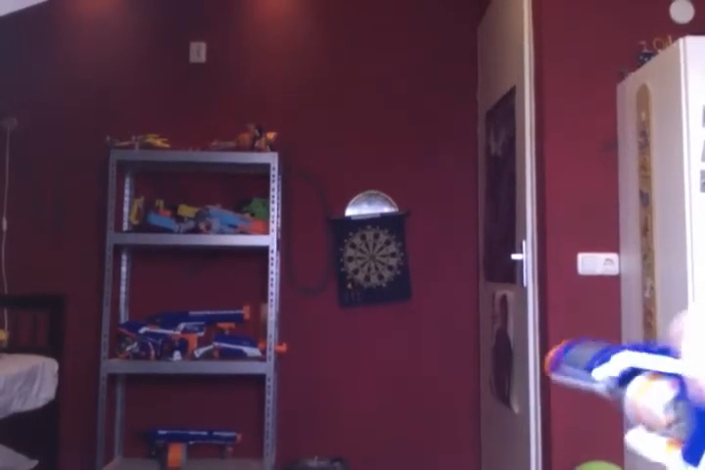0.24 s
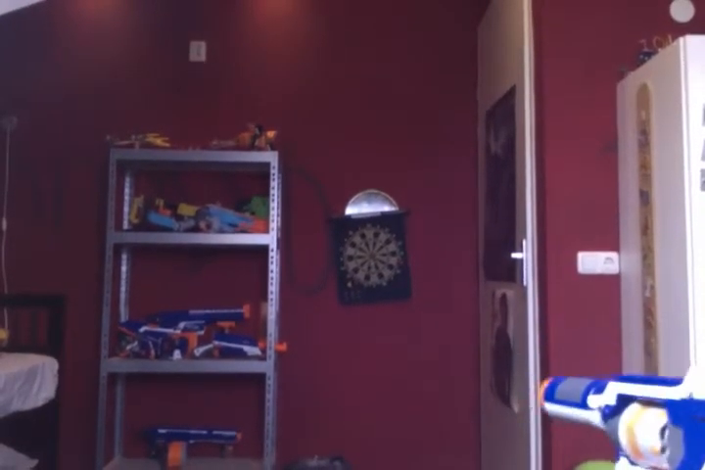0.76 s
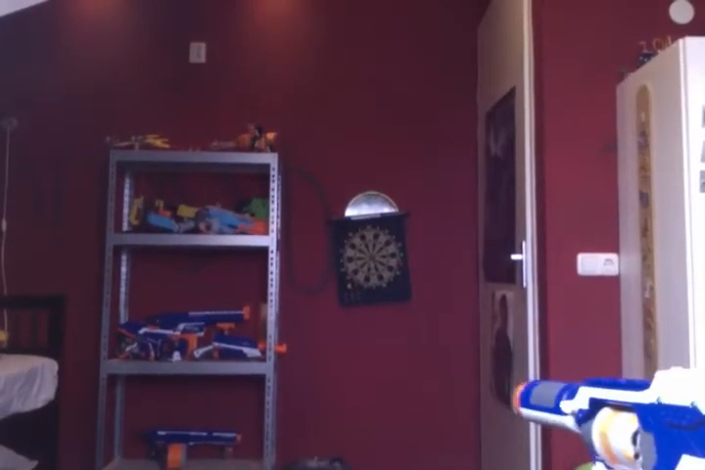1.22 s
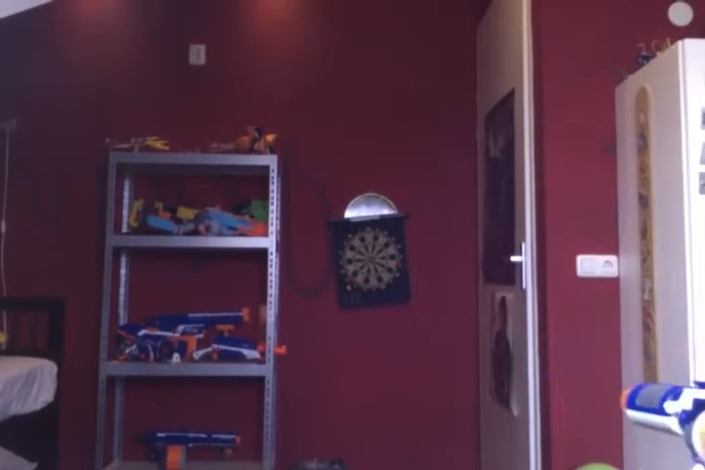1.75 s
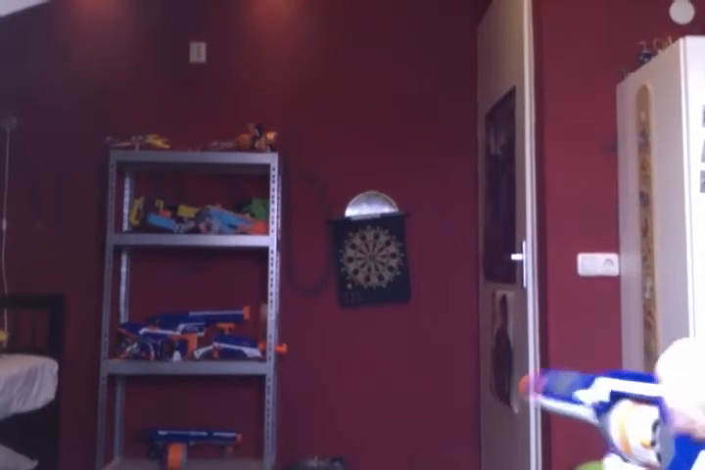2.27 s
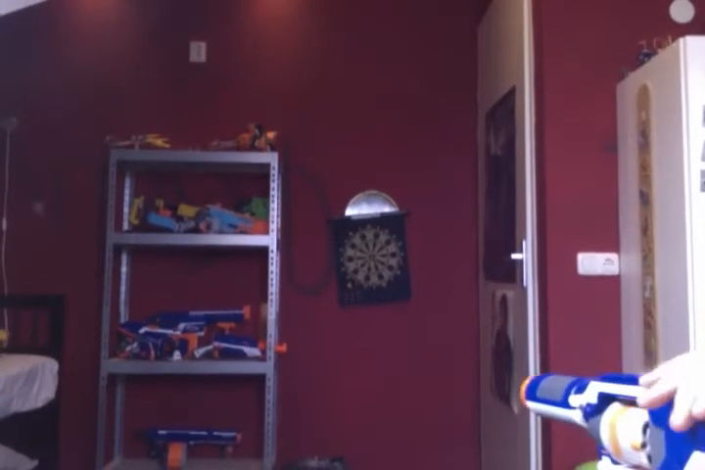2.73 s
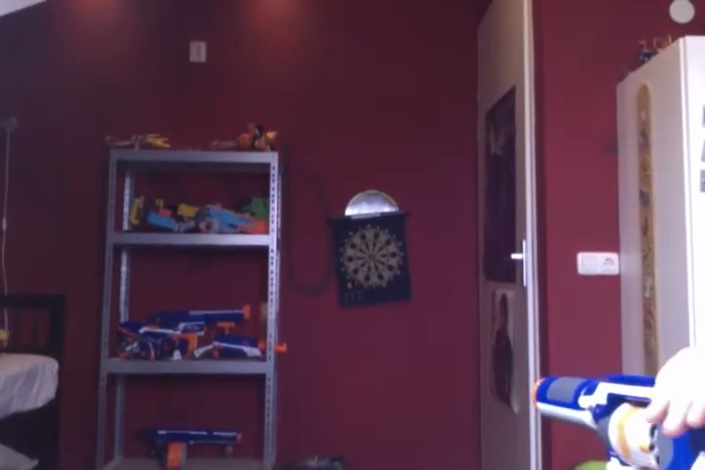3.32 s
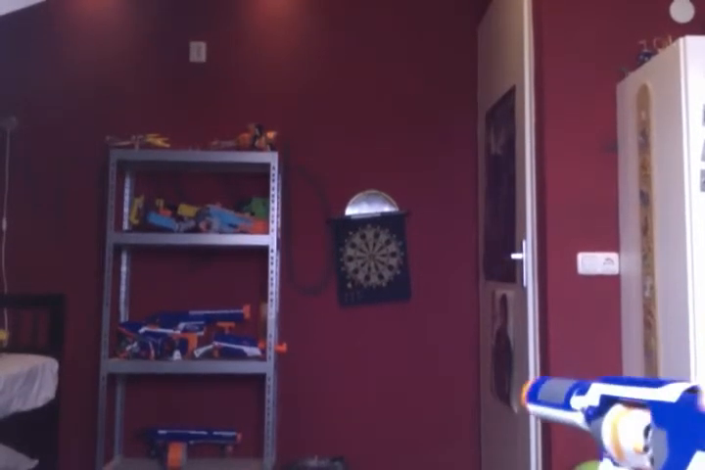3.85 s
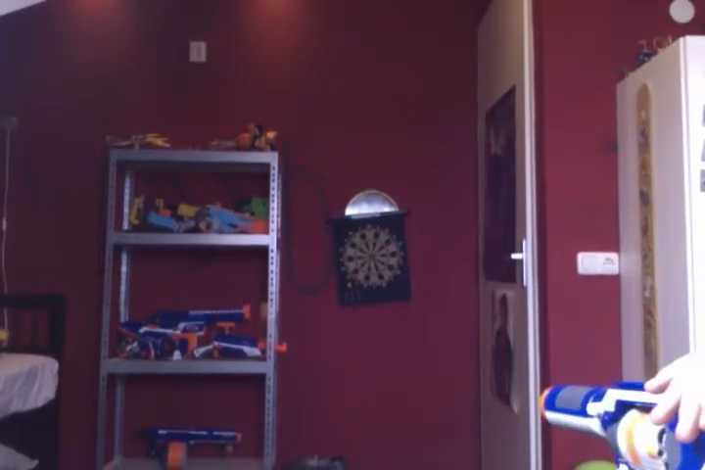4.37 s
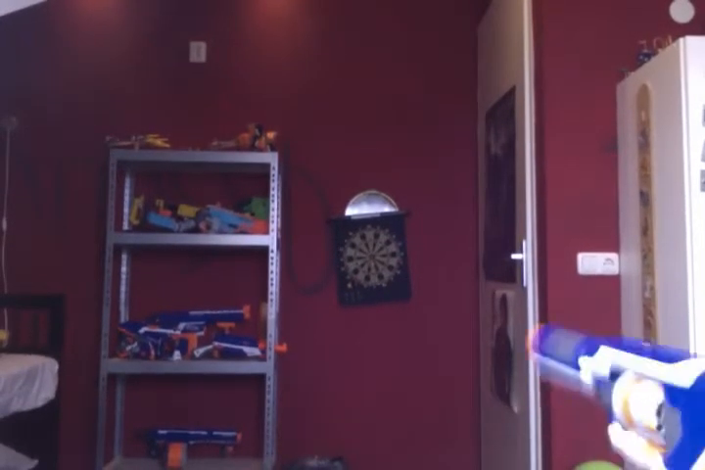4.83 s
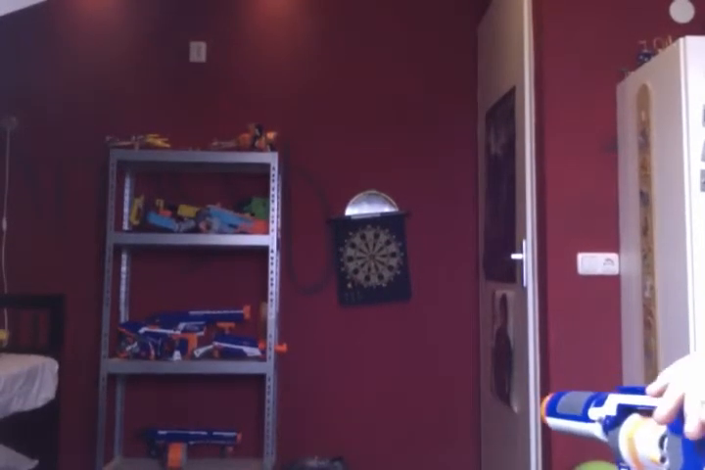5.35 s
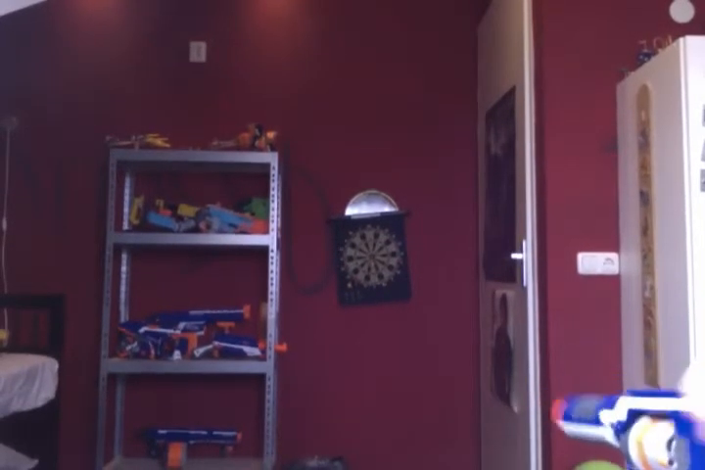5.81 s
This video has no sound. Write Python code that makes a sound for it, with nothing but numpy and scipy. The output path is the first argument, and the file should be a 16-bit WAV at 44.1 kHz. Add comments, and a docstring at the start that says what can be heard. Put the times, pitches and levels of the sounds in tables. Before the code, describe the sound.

A spring-powered toy dart blaster is repeatedly cocked with scraping plastic clacks and fired four times, each loud crack followed by a dart smacking a board.

```python
"""A small room, the microphone close to a spring-powered toy dart blaster that is fired four times.
Noise-driven resonances make the plastic clack as the slide scrapes back over its catch and is slammed home.
Each shot is a crack of filtered noise and a wavering barrel tone; a moment later the dart smacks a board
across the room. Hand bumps, rubs and a faint hush fill the gaps; the loudest blows overload the microphone."""
import sys
import numpy as np
from scipy import signal
from scipy.fft import rfft, irfft
from scipy.io import wavfile
from scipy.ndimage import uniform_filter1d

SR = 44100
rng = np.random.default_rng(int(sys.argv[2]) if len(sys.argv) > 2 else 0)


def transcribe(u):
    """Save the signal u as a 16-bit wav file named by the first command-line argument.

    u: samples, shape (n,) or (channels, n), limited to [-1, 1]; the rate is SR.
    q: integer samples, one column per channel.
    """
    v = np.clip(np.atleast_2d(u).T, -1, 1)
    q = np.round(v * 32767).astype(np.int16)
    wavfile.write(sys.argv[1], SR, q)


N = 268416  # length in samples

# resonances of the plastic shell: f/Hz, width/Hz, level/dB
SHELL = [(755, 450, 0.5), (825.5, 120, 8.5), (939, 110, 1.5), (1138, 94, 4), (1326, 120, -1),
         (1329, 120, -3)]
# resonances of the hollow inside: f/Hz, width/Hz, level/dB
HOLLOW = [(83.5, 42, -10.5), (140, 28, 0), (161.6, 22, 2), (258.3, 19, 8), (293, 150, -9), (585, 210, -3)]
# spectrum of a smack, also used for the tick of a bump: f/Hz, density/dB per Hz
SMACK = [(40, -35), (120, -6), (350, 0), (520, 2), (900, 1.5), (1350, 5), (2000, -2.5), (3500, -5),
         (5000, -18.5), (8000, -32), (16000, -46.5)]
# the slide is pulled back to cock the spring: t/s at the back stop, level/dB, draw length/s, scrape level/dB
PULLS = [(1.871, -1.5, 0.064, -15.5), (3.516, -1, 0.08, -18), (4.704, 0, 0.06, -16),
         (5.812, 1, 0.079, -17.5)]
# the slide is pushed forward and slammed home: t/s, edge crack level/dB, push length/s, scrape level/dB
SLAMS = [(.189, -5, 0.048, -14), (2.188, -11, 0.067, -18), (3.951, -16.5, 0.15, -26.5),
         (5.068, -18, 0.11, -25)]


def amp(db):
    """Turns decibels into an amplitude factor."""
    return 10 ** (np.asarray(db) / 20)


def evened(x):
    """Scales to an rms of one."""
    return x / np.sqrt(np.mean(x ** 2) + 1e-20)


def blow(x):
    """Scales to the energy of a hundredth of a second at an rms of one."""
    return x / np.sqrt(np.sum(x ** 2) * 100 / SR + 1e-20)


def read(points, hz):
    """Reads a table along a logarithmic frequency axis."""
    f, value = np.transpose(points)
    return np.interp(np.log(hz + 1), np.log(f), value)


def add(mix, s, sound):
    """Mixes a sound in at a time in seconds."""
    part = mix[max(round(s * SR), 0):][:len(sound)]
    part += sound[:len(part)]


def fades(size, rise_s, fall_s):
    """Smooth start and end of a stroke."""
    t = np.arange(size) / SR
    nearest_end = np.minimum(t / rise_s, t[::-1] / fall_s)
    return np.sin(np.pi / 2 * np.minimum(nearest_end, 1)) ** 2


def colour(x, spectrum, tilt_db=0, size=4096):
    """Causal minimum-phase filter with the given spectrum, tilted by dB per octave."""
    hz = abs(np.fft.fftfreq(size, 1 / SR))
    pivot_hz = 2000
    octaves = np.log2(np.maximum(hz / pivot_hz, .1))  # the tilt levels off in the bass
    log_gain = np.log(amp(read(spectrum, hz) + tilt_db * octaves))
    taps = np.fft.ifft(np.exp(np.conj(signal.hilbert(log_gain)))).real
    return signal.fftconvolve(x, taps[:size // 2])[:len(x)]


def ring(x, modes):
    """Sends a force through parallel resonances of alternating sign."""
    out = 0
    for k, (hz, width, db) in enumerate(modes):
        peak = signal.iirpeak(min(hz, SR / 2 - 1), hz / width, SR)
        out = out + (-1) ** k * amp(db) * signal.lfilter(*peak, x)
    return out


def chatter(decay_s, size=8192, count=5):
    """Force of a contact: a dense run of tiny hits that dies away, almost equally strong at all frequencies."""
    age = np.arange(size) / SR / decay_s
    force = rng.standard_normal(size) * np.exp(-age)
    for _ in range(count):
        flat = irfft(np.exp(1j * np.angle(rfft(force))))
        force = flat * np.exp(-(age / 4) ** 4)
    return force


def room(x, build_s, first_s):
    """Reflections of random sign that build up, while each band dies at its own speed."""
    # reverberation of the small room: f/Hz, time to fall by 60 dB/s
    decay_times = [(80, 0.35), (250, 0.36), (500, 0.32), (1200, 0.29), (3000, 0.32), (6000, 0.3),
                   (10000, 0.24), (16000, 0.18)]
    t = np.arange(SR // 2) / SR
    taps = rng.choice([-1., 1.], len(t)) * (rng.random(len(t)) < .2)
    taps *= (t > first_s) * (1 - np.exp(-t / build_s))
    hz, at, z = signal.stft(taps, SR, nperseg=256)
    decay = amp(-60 * at / read(decay_times, hz)[:, None])
    tail = signal.istft(z * decay, SR, nperseg=256)[1]
    return signal.fftconvolve(x, tail / np.linalg.norm(tail))[:N]


def strokes():
    """Every scrape of plastic: (start s, end s, first dB, last dB, brightness dB per octave)."""
    # the hands rub along the plastic: t/s, length/s, level/dB, brightness/dB per octave
    rubs = [(0, 0.072, -25.5, 8.5), (0.53, 0.22, -47, 2.5), (1.39, 0.24, -51.5, 1.5), (1.512, 0.15, -43, 8),
            (5.746, 0.044, -24, -2.5)]
    draw_rise_db, draw_tilt_db = 29, 4  # the scrape grows as the spring tightens
    rasp_s, rasp_db, rasp_tilt_db = 0.075, -21.5, 8.5  # the slide rasps over the catch
    push_rise_db, push_tilt_db, overrun_s = 15.5, 3.5, 0.02
    rub_fade_db = 11.5
    for s, db, draw_s, scrape_db in PULLS:
        yield s - draw_s, s, scrape_db - draw_rise_db, scrape_db, draw_tilt_db
        yield s, s + rasp_s, db + rasp_db, db + rasp_db, rasp_tilt_db
    for s, _, push_s, scrape_db in SLAMS:
        yield s - push_s, s + overrun_s, scrape_db - push_rise_db, scrape_db, push_tilt_db
    for s, length, db, tilt_db in rubs:
        yield s, s + length, db, db - rub_fade_db, tilt_db


def slide(grain_db=-1.0, slips_per_s=2200, judder_db=2.5, twang_db=-20, grab_s=.016, let_go_s=0.0073):
    """Plastic slips over plastic in tiny catches of uneven size; each pull sets the spring humming."""
    # spectrum of the scrape: f/Hz, density/dB per Hz
    scrape = [(60, -27), (300, -2), (550, -2.5), (900, 1.5), (1600, -0.5), (3000, -5), (4800, -15),
              (6100, -22.5), (8000, -28), (16000, -45.5)]
    # hum of the spring: f/Hz, width/Hz, level/dB
    coil = [(290, 32, 5.5), (284.5, 9.4, 1)]
    out = np.zeros(N)
    size_db = grain_db * np.minimum(rng.exponential(1, N), 4)
    size_db += judder_db * evened(uniform_filter1d(rng.standard_normal(N), size=260))
    slips = rng.choice([-1., 1.], N) * (rng.random(N) < slips_per_s / SR) * amp(size_db)
    for start, end, first_db, last_db, tilt_db in strokes():
        catches = slips[max(round(start * SR), 0):round(end * SR)]
        rub = evened(colour(catches, scrape, tilt_db)) + amp(-20) * evened(ring(catches, SHELL))
        level = amp(np.linspace(first_db, last_db, len(rub)))
        add(out, start, rub * level * fades(len(rub), grab_s, let_go_s))
    for s, db, _, _ in PULLS:
        add(out, s, amp(db + twang_db) * blow(ring(chatter(0.01), coil)))
    return out + amp(-4) * room(out, build_s=0.0028, first_s=0.0039)


def shaking(lead_s=.025):
    """How hard the hands shake the body: each grip or pull swells, holds and dies away."""
    # the grip shifts on the body: t/s, hold/s, level/dB
    grips = [(0, 0.022, -22), (1.285, 0.019, -29), (1.36, 0.19, -31.5), (2.085, .03, -39),
             (2.245, 0.018, -19.5), (3.66, .06, -36), (5.91, 0.017, -60)]
    strain_s, strain_db = 0.094, -21.5  # the strained body booms around the back stop
    attack_s, release_db_per_s = 0.031, 153
    t = np.arange(N) / SR
    strains = [(s - lead_s, strain_s, db + strain_db) for s, db, _, _ in PULLS]
    total = np.zeros(N)
    for s, hold, db in list(grips) + strains:
        swell = np.clip(1 + (t - s) / attack_s, 0, 1)
        total += swell * amp(db - release_db_per_s * np.maximum(t - s - hold, 0))
    return total


def handling(rumble_db=-13):
    """Bumps and the working hands make the hollow body boom."""
    # dull bumps of the hand on the body: t/s, level/dB, contact tick level/dB
    bumps = [(0.724, -20.5, -36), (2.228, -10.5, -20.5)]
    soft = signal.butter(2, [70, 380], "band", fs=SR)  # a hand pushes too slowly to excite the treble
    rumble = evened(signal.lfilter(*soft, ring(rng.standard_normal(N), HOLLOW)))
    out = amp(rumble_db) * rumble * shaking()
    for s, db, tick_db in bumps:
        push = signal.lfilter(*soft, chatter(.004))
        add(out, s, amp(db) * blow(ring(push, HOLLOW)))
        add(out, s, amp(tick_db) * blow(colour(chatter(0.0017), SMACK)))
    return out + amp(-7.5) * room(out, build_s=0.0022, first_s=0.0022)


def favour(modes, struck_hz, focus_hz):
    """The place of a blow decides which modes answer most."""
    return [(hz, width, db - 10 * np.log10(1 + ((hz - struck_hz) / focus_hz) ** 2)) for hz, width, db in modes]


def blows():
    """Every blow on the plastic, with the columns of the latching and absolute times."""
    # every pull meets the catch, hits the stop, latches, settles and is let go; levels relative to the pull:
    # t/s after the stop, shell level/dB, favoured shell f/Hz, edge level/dB, favoured edge f/Hz,
    # spring zing level/dB, hollow boom level/dB, room share/dB
    latching = [(-.009, -25, 1090, -19.5, 2840, -33, -27, 2.5), (0, -13.5, 1090, -14, 2570, -31.5, -27, -1),
                (.029, -22.5, 1250, -18.5, 2950, -16.5, -26.5, -2.5),
                (.037, -24, 1220, -14.5, 2850, -30, -31, -4.5),
                (.06, -26.5, 1076, -20.5, 2470, -36, -40.5, -3.5)]
    # clicks of the trigger and of the hands on the plastic:
    # t/s, level/dB, favoured shell f/Hz, hardness/dB (edge over shell), hollow boom level/dB
    clicks = [(.002, -29, 990, 7, -22.5), (0.088, -29.5, 770, -8.5, -46.5), (.129, -38.5, 885, 7.5, -60),
              (.308, -30.5, 970, -4, -76), (.541, -39.5, 840, -17.5, -72.5), (.55, -38, 900, -3, -76),
              (0.576, -46, 960, 1.5, -67.5), (0.623, -38.5, 1003, 1.5, -67.5), (1.234, -25, 885, 3, -35.5),
              (1.526, -31.5, 1090, 2.5, -34.5), (1.608, -34, 990, -2.5, -33.5), (1.696, -36, 900, -29, -56),
              (1.715, -29.5, 990, -8, -36), (2.057, -31, 770, -12, -45), (2.529, -26, 1030, -5.5, -45.5),
              (2.555, -13.5, 996, -5, -33.5), (2.595, -23, 1110, 0, -55.5), (3.458, -23.5, 820, -7, -30),
              (3.713, -30.5, 800, -4, -36.5), (3.874, -31.5, 1070, 3, -41.5),
              (4.237, -41.5, 886, -0.5, -67.5), (4.629, -25, 1000, -7.5, -45), (4.888, -31, 745, -3.5, -36),
              (4.936, -34, 990, -2.5, -46), (4.986, -43, 1046, 10, -68), (5.379, -42.5, 856, -2, -58),
              (5.394, -32.5, 960, 1.5, -67), (5.757, -22.5, 860, -5, -31), (6.051, -38.5, 710, -10, -34)]
    # light, dry ticks of the hard edges: t/s, level/dB
    ticks = [(.776, -35), (2.514, -37.5), (3.431, -33), (3.796, -40), (4.174, -40), (5.28, -46.5)]
    slam_db, slam_hz, slam_edge_hz, slam_boom_db, slam_room_db = -11.5, 1100, 2410, -28.5, -5.5
    click_edge_hz, click_room_db = 2530, -0.5
    tick_hz, tick_shell_hz = 3100, 1400
    tick_shell_db, tick_zing_db, tick_boom_db, tick_room_db = -9.5, -32.5, -16.5, -11
    zing_db = -18  # the spring's share of an edge crack, for slams and clicks
    for s, db, _, _ in PULLS:
        for after, shell, shell_hz, edge, edge_hz, spring, boom, room_db in latching:
            yield s + after, db + shell, shell_hz, db + edge, edge_hz, db + spring, db + boom, room_db
    for s, edge, _, _ in SLAMS:
        yield s, slam_db, slam_hz, edge, slam_edge_hz, edge + zing_db, slam_boom_db, slam_room_db
    for s, db, hz, hard, boom in clicks:
        yield s, db, hz, db + hard, click_edge_hz, db + hard + zing_db, boom, click_room_db
    for s, db in ticks:
        shell, spring, boom = db + tick_shell_db, db + tick_zing_db, db + tick_boom_db
        yield s, shell, tick_shell_hz, db, tick_hz, spring, boom, tick_room_db


def clacks(shell_focus_hz=150, edge_focus_hz=600, rebound_db=-11, rebound_s=.004):
    """Each blow and its rebound ring the shell, its hard edges, the spring and the hollow inside."""
    # resonances of the hard edges: f/Hz, width/Hz, level/dB
    edge_modes = [(1593, 220, 3), (2185, 130, 4), (2610, 790, -4.5), (3370, 540, 2), (3730, 520, 2)]
    # resonances of the spring: f/Hz, width/Hz, level/dB
    spring_modes = [(4560, 5700, 1), (5970, 90, 18), (6070, 950, 5), (8800, 830, -21),
                    (12600, 10000, -13.5)]
    near, spread = np.zeros(N), np.zeros(N)
    mid = signal.butter(3, [520, 5000], "band", fs=SR)
    high = signal.butter(3, 4500, "high", fs=SR)
    low = signal.butter(2, [70, 450], "band", fs=SR)
    for s, shell_db, shell_hz, edge_db, edge_hz, spring_db, boom_db, room_db in blows():
        force = chatter(.002)
        add(force, rebound_s * rng.uniform(.6, 1.0), amp(rebound_db) * chatter(0.0027))
        knock = signal.lfilter(*mid, force)
        sound = amp(shell_db) * blow(ring(knock, favour(SHELL, shell_hz, shell_focus_hz)))
        sound += amp(edge_db) * blow(ring(knock, favour(edge_modes, edge_hz, edge_focus_hz)))
        sound += amp(spring_db) * blow(ring(signal.lfilter(*high, force), spring_modes))
        sound += amp(boom_db) * blow(ring(signal.lfilter(*low, force), HOLLOW))
        add(near, s - .001, sound)  # one millisecond early to make up for the filters' delay
        add(spread, s - .001, amp(room_db) * sound)
    return near + room(spread, build_s=0.001, first_s=0.0023)


def shots(swell_s=0.019, waver_hz=90, flutter=0.49, overblow_hz=90, rush_width_hz=260, rush_db=-8):
    """The plunger slams forward, then a turbulent rush of air sounds the barrel."""
    # the four shots: t/s, crack level/dB, barrel tone level/dB, barrel f/Hz
    firings = [(0.824, 0.5, -5, 1316), (2.744, 1.5, -17.5, 827), (4.316, 0.5, -1.5, 1297),
               (5.454, 0.5, -3.5, 1232)]
    # spectrum of the crack: f/Hz, density/dB per Hz
    crack = [(30, -40), (60, -29), (80, -9), (105, -17.5), (160, -4), (350, -6), (600, -5), (850, 8),
             (1500, 3), (3000, 0.5), (6000, -7), (10000, -16.5), (16000, -21.5)]
    out, t = np.zeros(N), np.arange(SR // 4) / SR
    for s, crack_db, tone_db, hz in firings:
        add(out, s, amp(-13.5) * blow(colour(chatter(0.0086), crack)))  # the catch lets go first
        add(out, s + .004, amp(crack_db) * blow(colour(chatter(.007), crack)))
        waver, gust = evened(uniform_filter1d(rng.standard_normal((2, len(t))), size=110))
        pitch = hz + overblow_hz * np.exp(-t / swell_s) + waver_hz * waver
        phase = 2 * np.pi * np.cumsum(pitch) / SR
        airflow = t / swell_s * np.exp(1 - t / swell_s) * (1 + flutter * gust)
        rush = evened(ring(rng.standard_normal(len(t)), [(hz, rush_width_hz, 0)]))
        add(out, s, amp(tone_db) * airflow * (np.sin(phase) + amp(rush_db) * rush))
    return out + amp(-5.0) * room(out, build_s=0.013, first_s=.004)


def darts(direct_db=-17, board_db=-10, room_db=-7.5, pock_ring_db=-5):
    """Foam darts smack a board at the far side of the room and arrive mostly as reflections."""
    # darts landing: t/s, level/dB before distance, brightness/dB per octave
    landings = [(1.001, 4, 3.5), (2.953, -0.5, 2.5), (4.496, 0.5, 3.5), (5.627, 2.5, 5)]
    # a spent dart drops with a soft pock: t/s, level/dB before distance
    drops = [(3.221, -20)]
    # spectrum of the pock: f/Hz, density/dB per Hz
    pock = [(60, -63.5), (300, -37), (600, -15.5), (950, -10), (1350, -6.5), (1800, -13), (2300, -26),
            (3600, -20.5), (5000, -46), (16000, -66)]
    # what the spent dart falls on: f/Hz, width/Hz, level/dB
    floor = [(1340, 58, 0)]
    # what the darts strike: f/Hz, width/Hz, level/dB
    board = [(385, 93, -3), (1364, 16, 16)]
    echo_s, echo_db = 0.0082, -13.5  # the side wall throws back each dart's smack
    out, wall = np.zeros(N), np.zeros(N)
    for s, db, tilt_db in landings:
        force = chatter(0.004)
        smack = blow(colour(force, SMACK, tilt_db))
        add(out, s, amp(db) * (smack + amp(board_db) * blow(ring(force, board))))
        add(wall, s + echo_s, amp(db + echo_db) * blow(colour(chatter(.007), SMACK, tilt_db)))
    for s, db in drops:
        force = chatter(0.0021)
        add(out, s, amp(db) * (blow(colour(force, pock)) + amp(pock_ring_db) * blow(ring(force, floor))))
    reflections = room(out, build_s=.006, first_s=.003)
    return amp(direct_db) * out + wall + amp(room_db) * reflections


def scene():
    """The blaster over the faint hush of the room."""
    # spectrum of the hush: f/Hz, density/dB per Hz
    quiet = [(20, -22), (70, -8), (140, 2.5), (270, -3), (450, -11.5), (900, 3), (3000, -8), (6000, -35),
             (16000, -31.5)]
    hush = amp(-58) * evened(colour(rng.standard_normal(N), quiet))
    return (slide() + handling() + clacks() + shots() + darts() + hush)[None]


def suppress(x, below_db=-69, depth_db=-8):
    """A noise suppressor turns down the bands that have grown faint, which dries up the tails."""
    z = signal.stft(x, nperseg=256, noverlap=192)[2]
    across_bands = uniform_filter1d(abs(z) ** 2, size=7, axis=-2)
    power = abs(uniform_filter1d(across_bands, size=3, axis=-1))
    faint = 1 / (1 + (power / amp(below_db) ** 2))  # one in silence, near zero when loud
    return signal.istft(z * amp(depth_db * faint), nperseg=256, noverlap=192)[1][:, :N]


def record(dry):
    """The microphone input overloads with a hard knee; faint sound, deep bass and top treble are reduced."""
    clipped = dry / (1 + dry ** 8) ** (1 / 8)
    lean = signal.lfilter(*signal.butter(2, 42, "high", fs=SR), suppress(clipped))
    treble_cut = signal.firwin(401, 15850, window=("kaiser", 7), fs=SR)  # cutoff in Hz
    return signal.oaconvolve(lean, treble_cut[None], "same")


dry = scene()
out = record(dry)
transcribe(out)
```